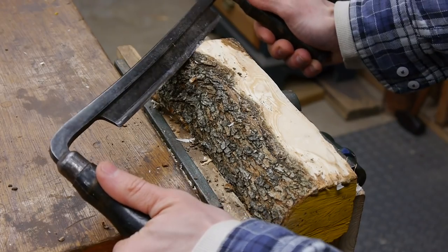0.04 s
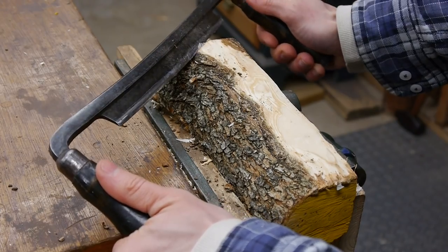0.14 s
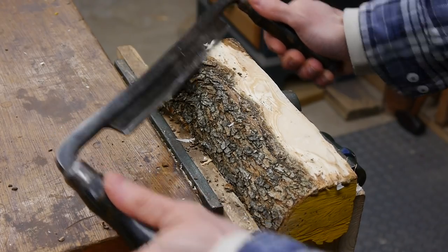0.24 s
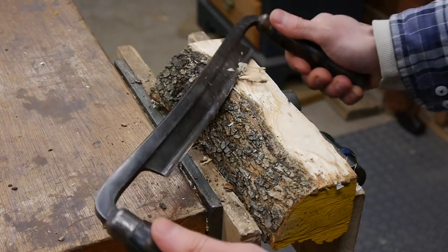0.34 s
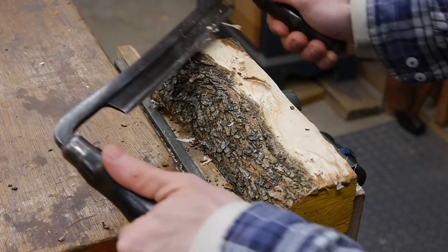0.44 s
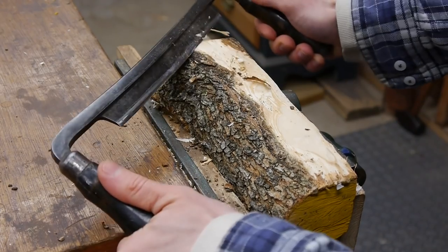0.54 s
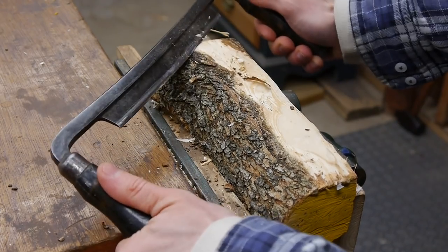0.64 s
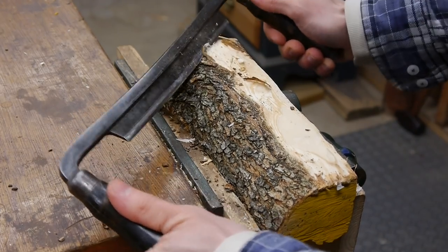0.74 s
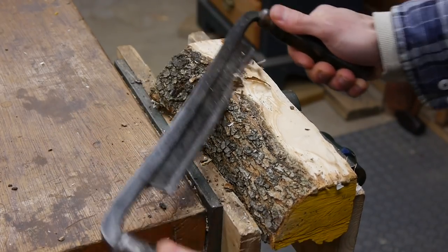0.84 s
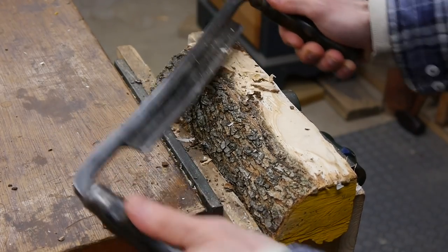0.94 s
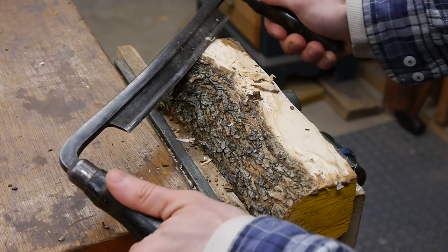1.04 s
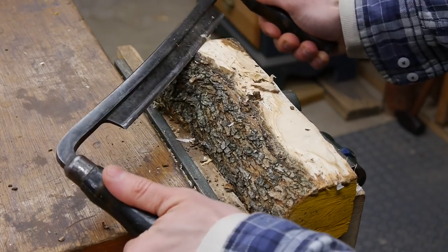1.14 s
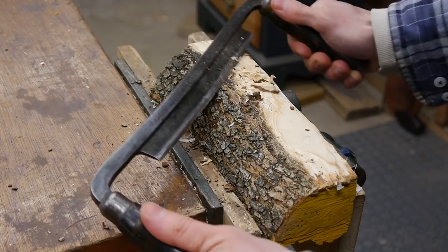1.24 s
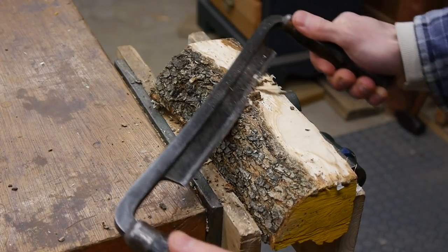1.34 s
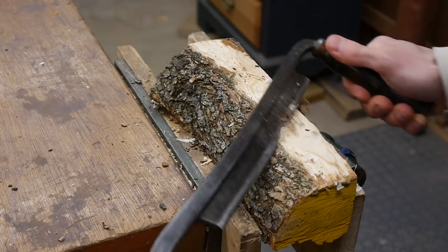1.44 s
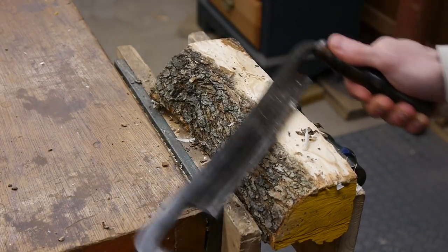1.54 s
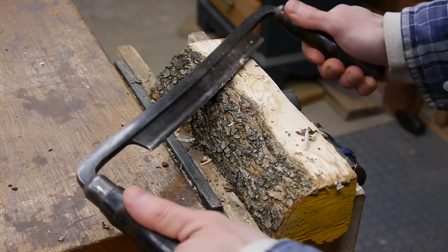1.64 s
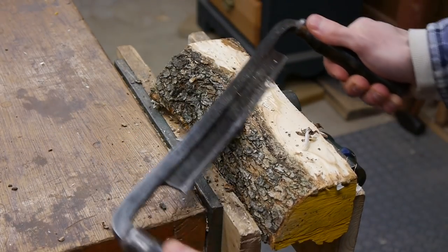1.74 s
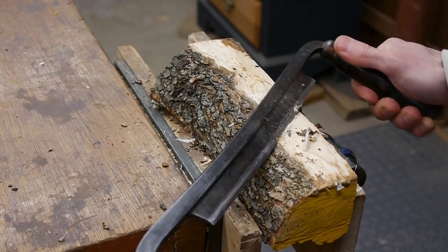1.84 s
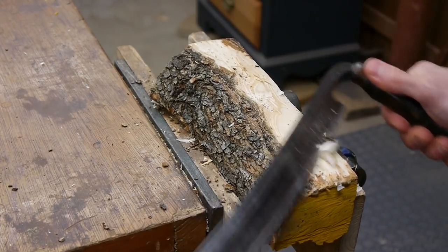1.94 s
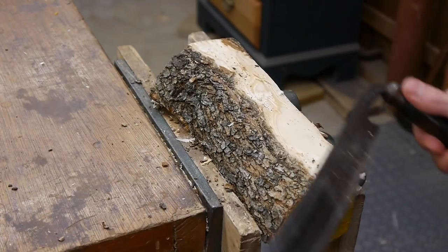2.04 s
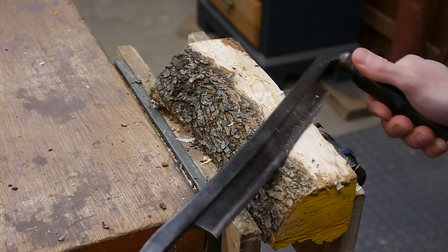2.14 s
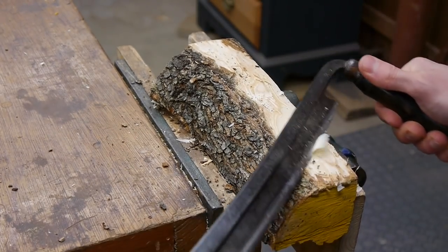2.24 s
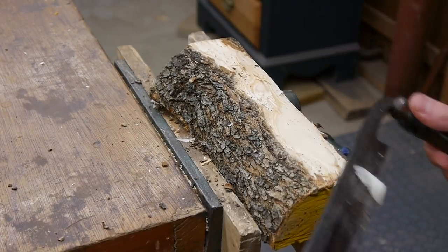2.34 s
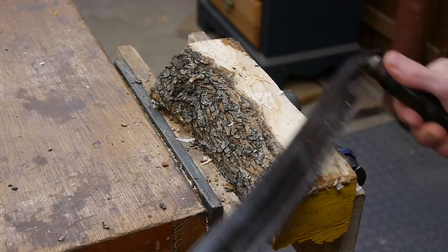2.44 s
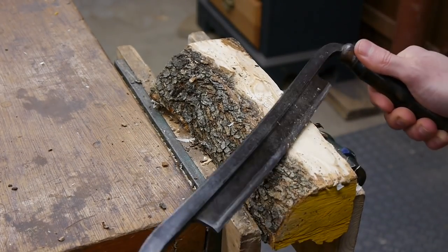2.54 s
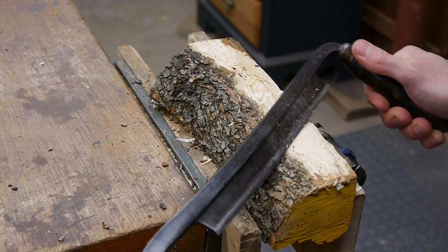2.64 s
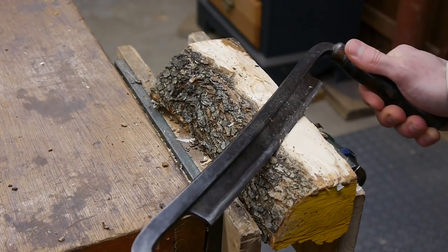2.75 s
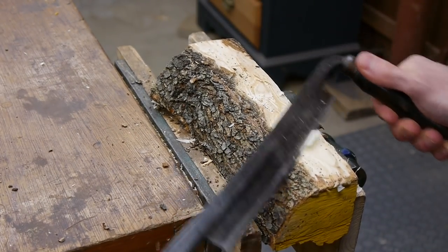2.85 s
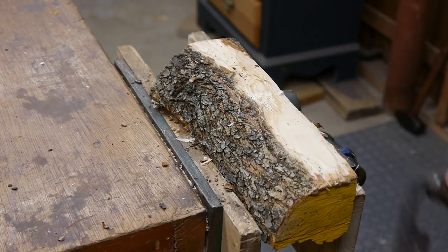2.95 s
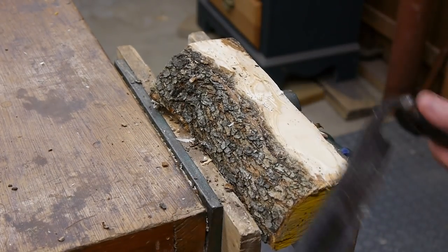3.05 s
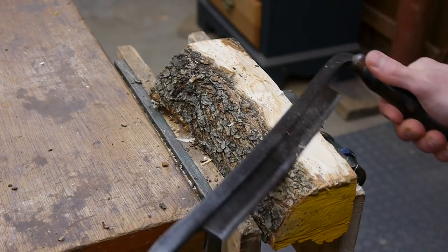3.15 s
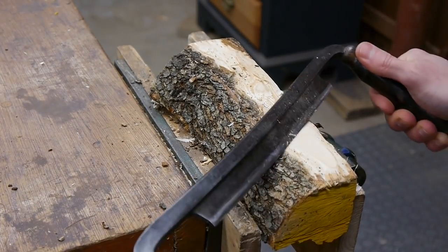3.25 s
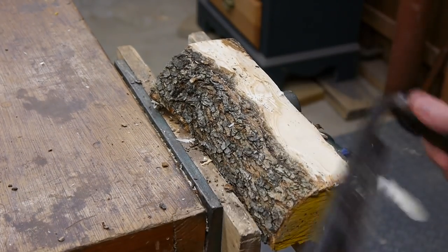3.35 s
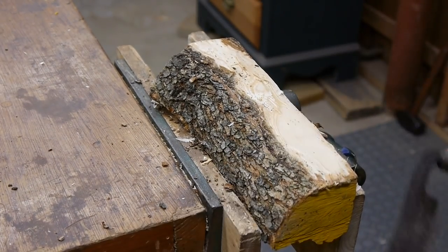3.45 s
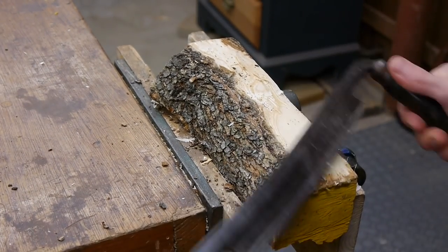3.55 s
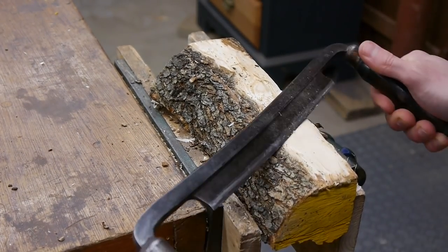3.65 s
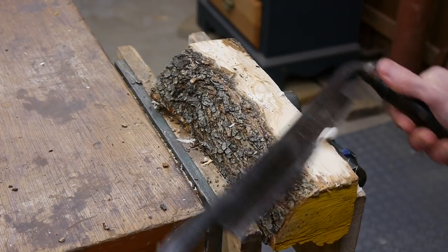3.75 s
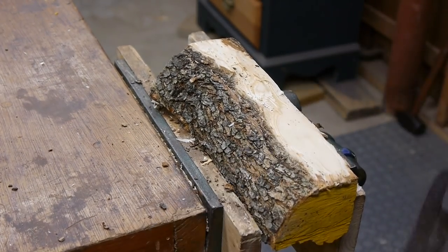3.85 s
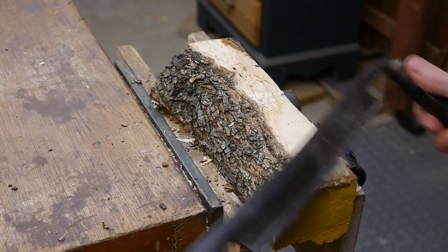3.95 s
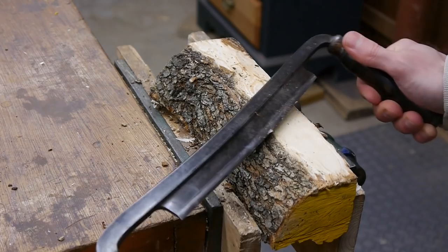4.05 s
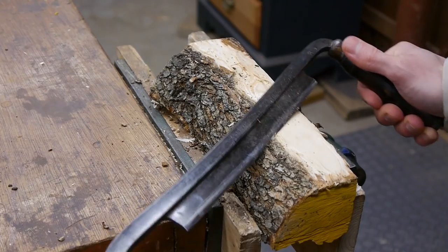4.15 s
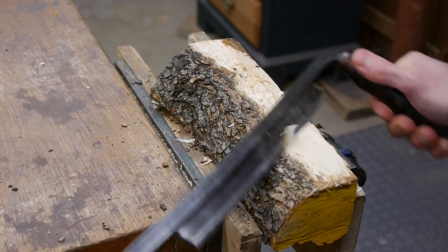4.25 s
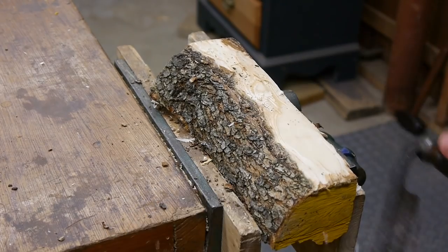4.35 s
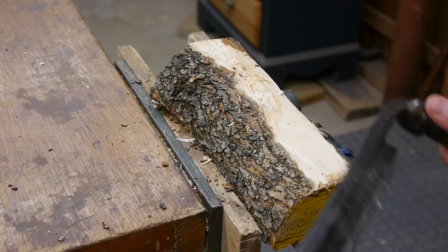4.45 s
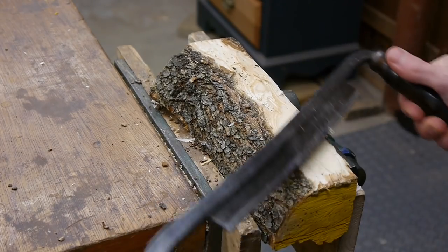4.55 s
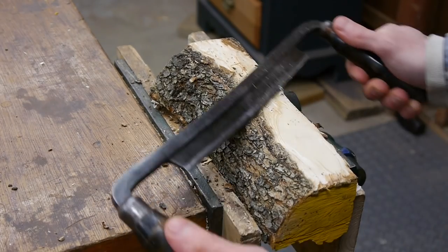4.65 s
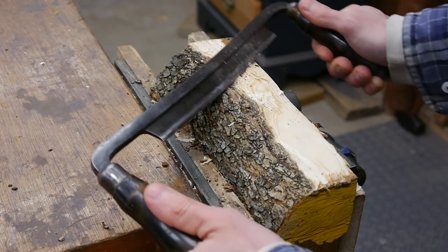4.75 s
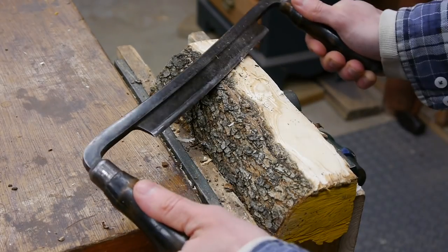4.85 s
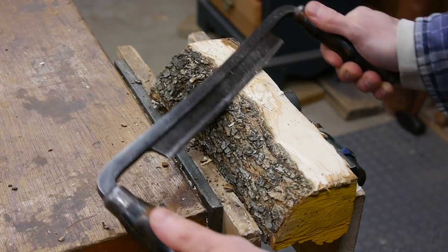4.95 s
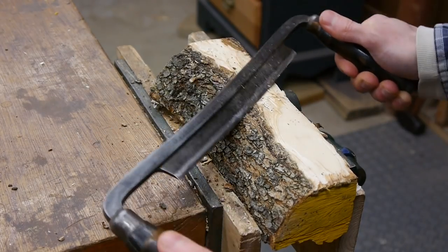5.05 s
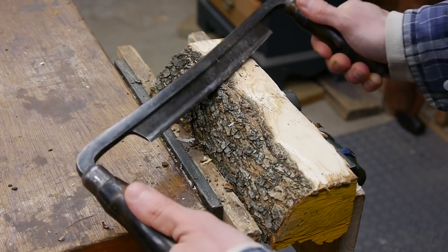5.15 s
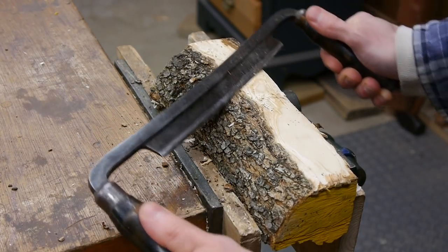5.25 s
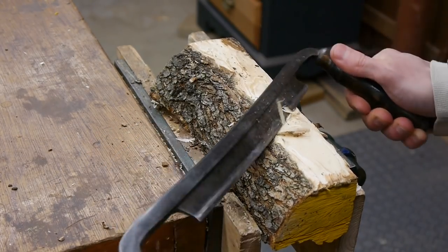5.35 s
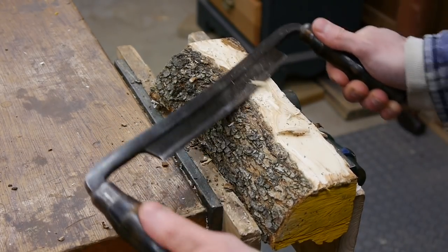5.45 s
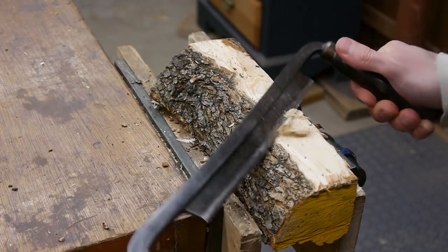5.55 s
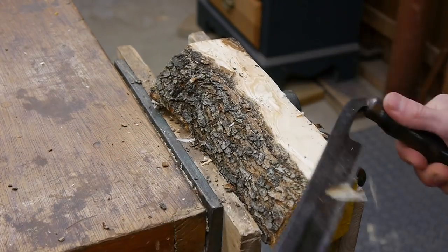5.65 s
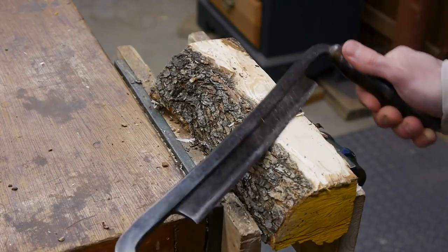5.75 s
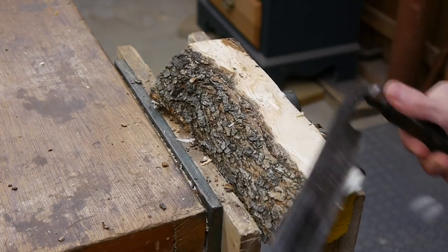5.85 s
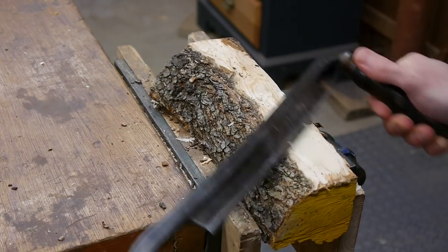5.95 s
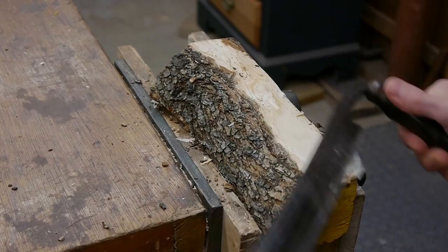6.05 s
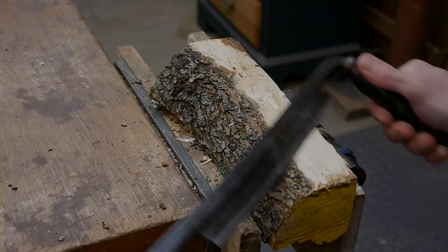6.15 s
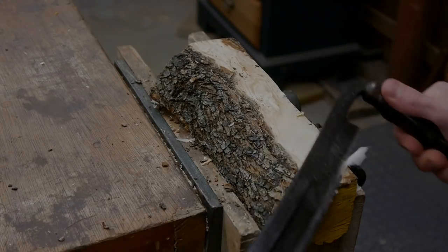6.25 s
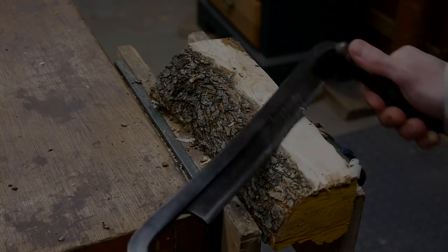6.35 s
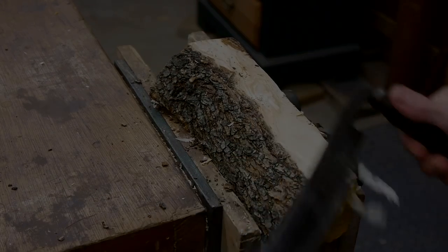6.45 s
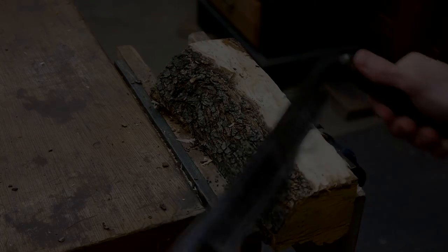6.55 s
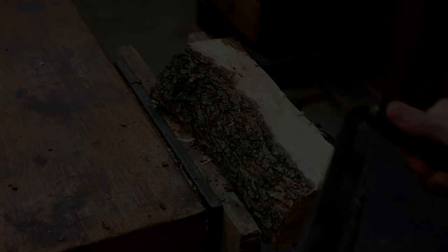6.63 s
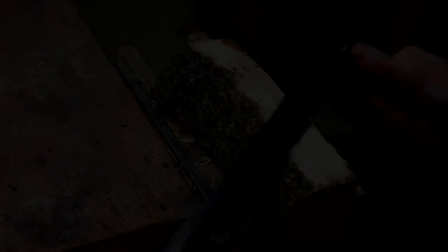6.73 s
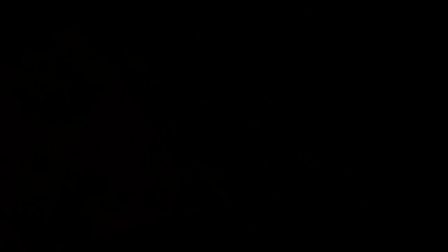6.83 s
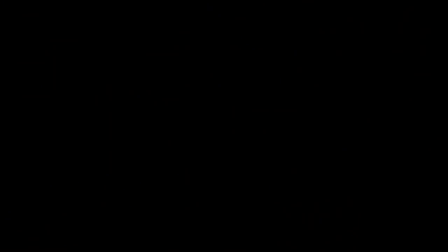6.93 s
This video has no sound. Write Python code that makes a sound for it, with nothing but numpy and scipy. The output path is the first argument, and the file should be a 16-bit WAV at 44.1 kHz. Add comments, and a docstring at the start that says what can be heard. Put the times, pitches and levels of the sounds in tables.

```python
"""Small workshop: a steel drawknife strips bark from a log clamped to a workbench, heard from close by.
The blade lands with wooden knocks (noise bursts through ringing modes), over a quiet murmur of air.
It then scrapes: random fibre fractures, shaped by the cutting force, sound log, bench and blade.
Bark snaps off in short crackles; faint pips (wavering sines) sound between; all fades out at the end."""
import sys
import numpy as np
from scipy import signal
from scipy.fft import rfft, irfft, next_fast_len
from scipy.io import wavfile
from scipy.ndimage import map_coordinates

SR = 44100
rng = np.random.default_rng(int(sys.argv[2]) if len(sys.argv) > 2 else 0)


def bounce(signal):
    """Save signal as a 16-bit WAV file at the path given by the first command-line argument."""
    frames = np.transpose(np.atleast_2d(signal))
    limited = np.clip(frames, -1, 1)
    pcm = np.round(limited * 32767).astype(np.int16)
    wavfile.write(sys.argv[1], SR, pcm)


N = 308257


def amp(db):
    """Decibels to gain."""
    return 10 ** (np.asarray(db) / 20)


def unit(x):
    """Scale to rms 1."""
    return x / np.sqrt(np.mean(x ** 2) + 1e-20)


def norm(x):
    """Scale to energy 1."""
    return x / np.sqrt(np.sum(x ** 2) + 1e-20)


def along(points, hz):
    """Interpolate (Hz, value) points on a log frequency axis."""
    f, v = np.transpose(points)
    return np.interp(np.log(hz + 1), np.log(f), v)


def ring_time():
    """Time axis of one half-second ring-out, s."""
    return np.arange(SR // 2) / SR


def through(x, response):
    """x convolved with an impulse response, cut to the length of x."""
    return signal.fftconvolve(x, response)[:len(x)]


def add(track, start_s, sound):
    """Mix a sound into a track from start_s."""
    part = track[max(0, round(start_s * SR)):][:len(sound)]
    part += sound[:len(part)]


def lowpass(x, hz, order=2):
    """Soften the treble above hz."""
    return signal.sosfilt(signal.butter(order, min(hz, SR / 2 - 1), fs=SR, output="sos"), x)


def highpass(x, hz, order=2):
    """Thin the bass below hz."""
    return signal.sosfilt(signal.butter(order, hz, "highpass", fs=SR, output="sos"), x)


def colour(points, size=4096):
    """Minimum-phase impulse response of energy 1 with the given spectrum, by folding its cepstrum."""
    log_gain = np.log(amp(along(points, np.fft.rfftfreq(size, 1 / SR))))
    cepstrum = irfft(log_gain)
    cepstrum[1:size // 2] *= 2
    cepstrum[size // 2 + 1:] = 0
    return norm(irfft(np.exp(rfft(cepstrum))))


def wobble(rate_hz):
    """A smooth random curve with rate_hz knots a second."""
    knots = rng.standard_normal(int(N * rate_hz / SR) + 4)
    return map_coordinates(knots, [np.arange(N) * rate_hz / SR])


def slips(count, rate_hz, spread_db):
    """Tiny fractures at random moments, rate_hz a second on average, of random size and sign; rms 1."""
    size = amp(spread_db * np.minimum(rng.standard_normal(count), 2))
    happens = rng.random(count) < rate_hz / SR
    return unit(happens * size * rng.choice([-1, 1], count))


def modes(table, scatter_db):
    """Sum of decaying sines, each at a slightly new strength and polarity; energy 1."""
    t = ring_time()
    ring = np.zeros(len(t))
    for mode_hz, level_db, t60_s in table:
        envelope = amp(level_db + scatter_db * rng.standard_normal() - 60 * t / t60_s)
        ring += rng.choice([-1, 1]) * envelope * np.sin(2 * np.pi * mode_hz * t)
    return norm(ring)


# workshop background spectrum: (freq_hz, relative_level_db)
AIR_SPECTRUM = [(20, -2), (60, -7), (110, -6), (138, 6), (170, -6), (310, -1.5), (550, 0), (1100, -9),
                (2000, -10), (4000, -15), (7500, -20.5), (10500, -18), (16000, -19)]
# side gain of the background: (freq_hz, side_db)
AIR_WIDTH = [(40, -3.5), (130, -9.5), (400, -14.5), (1500, 2), (5000, 3.5), (15000, -2)]
AIR_DB = -62


def air():
    """Steady murmur and hiss: coloured noise, its stereo width set by frequency."""
    mid = through(rng.standard_normal(N), colour(AIR_SPECTRUM))
    side = through(rng.standard_normal(N), colour(AIR_SPECTRUM))
    side = irfft(rfft(side) * amp(along(AIR_WIDTH, np.fft.rfftfreq(N, 1 / SR))), N)
    return np.array([mid + side, mid - side]) * amp(AIR_DB)


# workshop reverberation: (freq_hz, t60_s)
ROOM_DECAY = [(200, 0.39), (600, 0.31), (1500, 0.22), (4000, 0.12), (14000, 0.057)]


def room(wet_db):
    """Direct sound plus a fresh noise tail whose treble dies first."""
    hz, t, z = signal.stft(rng.standard_normal(SR // 2), SR, nperseg=256)
    decay = amp(-60 * t / along(ROOM_DECAY, hz)[:, None])
    tail = signal.istft(z * decay, SR, nperseg=256)[1][:SR // 2]
    response = amp(wet_db) * norm(tail * (1 - np.exp(-ring_time() / .003)))
    response[0] += 1
    return norm(response)


# log and bench-top modes: (mode_hz, level_db, t60_s)
WOOD_MODES = [(135.4, -17, 0.51), (378, 2, 0.16), (422.6, -1.5, 0.13), (491, -3.5, 0.27), (524, -7, 0.19),
              (585.4, 0, 0.13), (647.3, 0, 0.22), (705.7, 5, 0.081), (765, -3.5, 0.17), (837, 3, 0.15),
              (884.6, 3.5, 0.11), (953.5, -5, 0.097), (1080, -11.5, 0.13), (1190, -12, 0.094),
              (1286, -3.5, 0.2), (1393, 2, 0.075), (1486, 9, 0.06), (1640, -19.5, 0.08), (1886, -5.5, .12),
              (1932, -1.5, .14), (2070, -0.5, .08), (2140, -0.5, 0.025)]
# direct clack of log and bench: (freq_hz, relative_level_db)
BENCH_SPECTRUM = [(200, -39.5), (330, -6.5), (450, 0.5), (900, 3), (1500, 1.5), (2100, -4.5), (2500, -9),
                  (3500, -15), (5000, -10), (7000, -26.5), (16000, -47.5)]


def wood(dense_db, direct_db):
    """The log's clear modes over its direct clack and the dense response of bench and room."""
    clack = np.pad(colour(BENCH_SPECTRUM), (0, SR // 2))[:SR // 2]
    dense = norm(through(room(wet_db=9.0), clack))
    return norm(modes(WOOD_MODES, scatter_db=1) + amp(direct_db) * clack + amp(dense_db) * dense)


# steel blade modes, damped by hands and bark: (mode_hz, level_db, t60_s)
STEEL_MODES = [(2970, -8, 0.018), (3690, -10, 0.024), (4660, 3, 0.011), (4880, 3.5, 0.021),
               (5160, -4.5, 0.011), (5710, -3, 0.019), (7900, -7, 0.068), (9750, -3, 0.037),
               (9650, -1.5, 0.11), (9780, -8, 0.15), (10650, -11.5, .04), (13000, -5, 0.037),
               (14600, -13, .05), (15350, -10.5, 0.022)]
# fibre crack spectrum: (freq_hz, relative_level_db)
FIBRE_SPECTRUM = [(300, -22.5), (2000, -15.5), (3500, -12), (5500, -10), (6800, -6.5), (8700, -4),
                  (9800, 0.5), (12000, -1), (15500, 0.5), (17000, -14)]


def edge(steel_db, wet_db):
    """A crisp crack at the cutting edge, which also rings the blade."""
    crack = np.pad(colour(FIBRE_SPECTRUM), (0, SR // 2))[:SR // 2]
    return norm(through(crack + amp(steel_db) * modes(STEEL_MODES, scatter_db=3.0), room(wet_db)))


# clamped log swaying on the bench, before the low cut: (mode_hz, level_db, t60_s)
SWAY_MODES = [(240, -15.5, 0.22), (275.7, -12, 0.15), (307.6, -0.5, 0.21), (348, -10.5, 0.1)]


def sway(low_cut_hz=240):
    """Low ring of the log rocking in its clamp."""
    return norm(highpass(modes(SWAY_MODES, scatter_db=2.5), low_cut_hz, order=4))


# blade lands, rebounds or jolts free; levels before the gains in knocks():
# (start_s, knock_db, knock_hz, steel_db, thump_db)
KNOCKS = [(0.007, -40.5, 890, -49, -51), (0.574, -22.5, 816, -52, -52), (1.087, -27.5, 734, -74, -38),
          (1.714, -18.5, 940, -44, -33), (2.205, -20.5, 850, -32, -37), (2.416, -39, 1190, -52, -41.5),
          (2.626, -14.5, 944, -32, -42.5), (2.988, -16, 680, -38, -21), (3.202, -31.5, 730, -56, -45.5),
          (3.21, -21.5, 708, -51.5, -33), (3.225, -23, 780, -49.5, -41), (3.429, -19, 1380, -22.5, -24),
          (3.704, -30.5, 870, -47.5, -51), (3.857, -23, 780, -49, -30), (4.17, -31, 650, -67.5, -51),
          (4.802, -42.5, 560, -69, -60), (5.218, -22, 745, -44, -38), (5.528, -35, 388, -58, -44),
          (5.79, -23.5, 830, -41.5, -43.5), (5.801, -24, 900, -46.5, -40.5), (6.03, -16, 920, -26, -43),
          (6.208, -17, 850, -30, -40), (6.392, -25, 656, -45.5, -56), (6.566, -23.5, 666, -43, -55),
          (6.748, -36, 600, -60, -54), (6.824, -33, 1454, -45, -53), (6.888, -33, 577.4, -60, -48)]
CONTACT_TAU_S = 0.002  # time constant of a landing blade's contact
CHATTER_T60_S, BITE_T60_S, PRESS_T60_S = 0.051, 0.036, 0.55
KNOCK_GAIN_DB, THUMP_GAIN_DB = 19.5, 27
TICK_GAIN_DB, CRACK_GAIN_DB, CLANK_GAIN_DB = 22, 18, 5


def knocks():
    """Landing blade: an impact and brief chatter excite the wood in a narrow band, the edge and the clamp."""
    out, t = np.zeros(N), ring_time()
    impact = .5 * (t == 0)
    settle = 1 - np.exp(-t / CONTACT_TAU_S)
    for start_s, knock_db, knock_hz, steel_db, thump_db in KNOCKS:
        rebounds = slips(len(t), rate_hz=1500, spread_db=2)
        blow = impact + norm(rebounds * settle * amp(-60 * t / CHATTER_T60_S))
        # the resting blade damps the log
        pressed = wood(dense_db=-2, direct_db=-8.0) * amp(-60 * t / PRESS_T60_S)
        knock = highpass(through(blow, pressed), knock_hz)
        knock = norm(lowpass(knock, knock_hz * 1.023, order=3))
        thump = norm(sway() * (1 - np.exp(-t / 0.0055)))

        fractures = slips(len(t), rate_hz=4900, spread_db=1.0)
        bite = impact + norm(fractures * amp(-60 * t / BITE_T60_S))
        tick = norm(through(bite, edge(steel_db=-7, wet_db=-4.5)))
        # surface crack of the wood, then the clank of the blade's lowest modes
        crack = norm(lowpass(highpass(through(bite, room(wet_db=-9)), 1500), 3800, order=3))
        clank = norm(lowpass(through(blow, edge(steel_db=-6, wet_db=-7.5)), 3000, order=4))

        sound = amp(knock_db + KNOCK_GAIN_DB) * knock
        sound += amp(thump_db + THUMP_GAIN_DB) * thump
        sound += amp(steel_db + TICK_GAIN_DB) * tick
        sound += amp(steel_db + CRACK_GAIN_DB) * crack
        sound += amp((knock_db + steel_db) / 2 + CLANK_GAIN_DB) * clank
        add(out, start_s, sound)
    return out


DIG_DB = 18  # rise in force while the edge digs in
COAST_DB, COAST_DB_PER_S = -27, 58.5  # then the blade skims on lightly


def bite_db(u_s, dig_s, hold_s, release_db_per_s):
    """Force of one cut, u_s seconds in: it grows, holds, lets go and skims on."""
    after_s = np.maximum(u_s - dig_s - hold_s, 0)
    letting_go = amp(-release_db_per_s * after_s) + amp(COAST_DB - COAST_DB_PER_S * after_s)
    return -DIG_DB * np.clip(1 - u_s / max(dig_s, 1e-3), 0, 1) + 20 * np.log10(letting_go)


# edge bites into the bark; song_db before the gains below:
# (start_s, dig_s, hold_s, drag_db, crackle_db, song_db, shudder_db)
CUTS = [(0.104, 0.0069, .045, -57.5, -76, -82, -62), (0.205, 0.026, .008, -45.5, -58, -67, -57),
        (0.295, 0.016, 0.022, -35, -41.5, -47, -54.5), (0.707, 0.026, .01, -38, -48, -61, -51),
        (0.811, 0.014, 0.041, -33, -37, -47, -46), (1.232, 0.011, .04, -53, -61.5, -64.5, -60),
        (1.288, 0.009, .01, -37.5, -50, -47.5, -52.5), (1.35, 0.034, .04, -57.5, -60, -69, -64),
        (1.424, 0.0089, 0.027, -38.5, -54, -65, -49), (1.478, 0.016, .014, -38.5, -42.5, -45.5, -55.5),
        (1.765, 0.057, 0.08, -44.5, -51.5, -55.5, -56), (1.934, 0.029, .055, -41, -50.5, -48, -53.5),
        (2.259, 0.019, .085, -42, -50.5, -49.5, -51.5), (2.685, 0.028, 0.019, -56.5, -64, -72, -65.5),
        (2.81, 0.12, 0.027, -35, -45.5, -44.5, -41), (3.315, .015, .02, -43.5, -61, -54, -56),
        (3.356, 0.019, .024, -33.5, -42, -40, -40.5), (3.699, 0.0039, .026, -41.5, -67, -71, -52),
        (3.75, .07, .028, -35.5, -44, -43.5, -34), (4.194, 0.02, .052, -45, -55.5, -58.5, -50),
        (4.297, 0.03, 0.019, -32, -36.5, -40, -39), (4.585, 0.014, .09, -64, -63.5, -74, -95),
        (4.94, .05, .07, -59.5, -64, -73, -63), (5.254, 0.066, .01, -43, -52.5, -50.5, -60),
        (5.346, 0.0082, .018, -33, -39.5, -46, -35.5), (5.524, .01, 0.037, -54.5, -62.5, -70, -55),
        (5.589, .014, .013, -33.5, -37, -40.5, -40), (5.69, 0.022, .04, -56.5, -63, -71, -64),
        (5.815, 0.057, .03, -37, -47, -45.5, -43.5), (6.056, 0.0092, .04, -41.5, -46.5, -50, -51.5),
        (6.254, 0.017, .03, -40.5, -46.5, -47, -49), (6.42, 0.029, .012, -42, -46, -44.5, -48),
        (6.585, 0.018, .015, -42.5, -49, -49, -47)]
WOOD_RELEASE_DB_PER_S, EDGE_RELEASE_DB_PER_S, SHUDDER_RELEASE_DB_PER_S = 295.5, 482.5, 260.5
WOOD_LAG_S, SWAY_LAG_S = 0.0033, 0.0067  # the edge sounds first, wood and sway follow
TOUCH_S = 0.004  # fade-in of contact
SING_GAIN_DB, RASP_GAIN_DB = -2, -7
SING_LOW_HZ, SING_HIGH_HZ = 4165, 6860
CRUMB_DB, CRUMB_DB_PER_S = -64, 31.5  # loose crumbs and shavings rustle on past the cut


def pulls():
    """The edge slips through fibres: the drag sounds the wood and the blade, the fractures crackle."""
    out, t = np.zeros(N), np.arange(N) / SR
    grip = amp(0.82 * wobble(50) + 2.5 * wobble(220))  # uneven bark catches and lets go
    clumps = amp(5.0 * wobble(110))  # fibres break in bundles
    for start_s, dig_s, hold_s, drag_db, crackle_db, song_db, shudder_db in CUTS:
        first = round(start_s * SR)
        span = slice(first, first + SR // 2)
        u = t[span] - start_s
        touch = np.clip(u / TOUCH_S, 0, 1) * unit(grip[span])
        on_wood = touch * amp(bite_db(u - WOOD_LAG_S, dig_s, hold_s, WOOD_RELEASE_DB_PER_S))
        on_edge = touch * amp(bite_db(u, dig_s, hold_s, EDGE_RELEASE_DB_PER_S))
        on_clamp = touch * amp(bite_db(u - SWAY_LAG_S, dig_s, hold_s, SHUDDER_RELEASE_DB_PER_S))

        drag = slips(len(u), rate_hz=1400, spread_db=4.5)
        crackle = slips(len(u), rate_hz=3500, spread_db=3)
        coarse = unit(clumps[span] * slips(len(u), rate_hz=760, spread_db=8.0))

        scrape = unit(drag + .6 * coarse) * on_wood
        sound = amp(drag_db) * through(scrape, wood(dense_db=-5.5, direct_db=-6))
        sound += amp(shudder_db) * through(drag * on_clamp, sway())
        sound += amp(crackle_db) * through(crackle * on_edge, edge(steel_db=-11.5, wet_db=-2.5))
        # rubbing favours the blade's middle modes, while coarse fibres rasp beside them
        song = highpass(modes(STEEL_MODES, scatter_db=0.5), SING_LOW_HZ, order=4)
        song = norm(lowpass(song, SING_HIGH_HZ, order=4))
        rubbing = unit(clumps[span] * drag) * on_edge
        sound += amp(song_db + SING_GAIN_DB) * through(rubbing, song)
        rasp = norm(lowpass(edge(steel_db=-7, wet_db=-5.5), 4500))
        sound += amp(song_db + RASP_GAIN_DB) * through(coarse * on_edge, rasp)

        crumbs = slips(len(u), rate_hz=7800, spread_db=1.5) * np.clip(u / (dig_s + hold_s), 0, 1)
        crumbs *= amp(CRUMB_DB - CRUMB_DB_PER_S * u)
        add(out, start_s, sound + through(crumbs, colour(FIBRE_SPECTRUM)))
    return out


# bark snaps and tears away; level before the gain in snaps(): (start_s, level_db, tear_t60_s)
SNAPS = [(0.311, -43, 0.064), (0.819, -36, 0.032), (0.834, -37.5, .02), (0.848, -19.5, 0.015),
         (0.8548, -26, .07), (1.237, -56, 0.0333), (1.305, -46, 0.047), (1.435, -47, 0.0291),
         (1.463, -38.5, .03), (1.864, -50.5, .04), (2.338, -49, 0.036), (2.895, -45, 0.046),
         (3.077, -49, 0.012), (3.215, -39, 0.014), (3.381, -34, .015), (3.431, -16, 0.043),
         (3.432, -25.5, 0.16), (3.95, -47.5, 0.009), (4.484, -51, 0.012), (4.953, -59.5, 0.02),
         (5.359, -39.5, .04), (5.599, -33.5, 0.048)]


def snaps(gain_db=2):
    """A chip breaks: a burst of fractures that dies away as it tears free."""
    out, t = np.zeros(N), ring_time()
    for start_s, level_db, tear_t60_s in SNAPS:
        tear = slips(len(t), rate_hz=9000, spread_db=2) * amp(-60 * t / tear_t60_s)
        add(out, start_s, amp(level_db + gain_db) * through(tear, edge(steel_db=-14.0, wet_db=-10.5)))
    return out


# faint pips between strokes; level before the gain in pips(): (centre_s, level_db)
PIPS = [(0.546, -54), (0.686, -53.5), (0.998, -48.5), (1.065, -55), (1.186, -49.5), (1.929, -47),
        (2.125, -51), (2.174, -57), (2.471, -56), (2.535, -55.5), (2.578, -54), (2.713, -49), (2.79, -55),
        (3.127, -56), (3.514, -48.5), (3.67, -51.5), (3.968, -49.5), (4.14, -50)]


def pips(pitch_hz=1190, length_s=0.019, gain_db=4.5, waver_rad=0.71, wet_db=-5):
    """Soft pips: sines of scattered pitch, husky from random phase, blurred by the room."""
    out, t = np.zeros(N), ring_time()
    for centre_s, level_db in PIPS:
        swell = np.sin(np.pi * np.minimum(t / length_s, 1)) ** 2
        waver = waver_rad * unit(lowpass(rng.standard_normal(len(t)), 150))
        pip_hz = pitch_hz * (1 + 0.02 * rng.standard_normal())
        pip = through(swell * np.sin(2 * np.pi * pip_hz * t + waver), room(wet_db))
        add(out, centre_s - length_s / 2, amp(level_db + gain_db) * pip / np.abs(pip).max())
    return out


def scene(side_db=-12, wide_hz=2000, bass_hz=125, deep_db=-17):
    """The work is straight ahead, its treble spread to the sides by a short noise tail; air surrounds it."""
    work = knocks() + pulls() + snaps() + pips()
    # a small log radiates little deep bass
    mid = highpass(work, bass_hz, order=5) + amp(deep_db) * lowpass(work, 90, order=3)
    t = ring_time()
    spread = norm(rng.standard_normal(len(t)) * amp(-60 * t / .05))
    side = amp(side_db) * through(highpass(mid, wide_hz, order=3), spread)
    return np.array([mid + side, mid - side]) + air()


FADE_START_S, FADE_DB_PER_S = 6.014, 52
TOP_HZ = 15900


def record(dry):
    """Closing fade, then a sharp band limit at TOP_HZ."""
    fade = amp(-FADE_DB_PER_S * np.maximum(np.arange(N) / SR - FADE_START_S, 0))
    size = next_fast_len(N + SR // 2)
    in_band = np.fft.rfftfreq(size, 1 / SR) < TOP_HZ
    return irfft(rfft(dry * fade, size) * in_band, size)[:, :N]


dry = scene()
out = record(dry)
bounce(out)
```